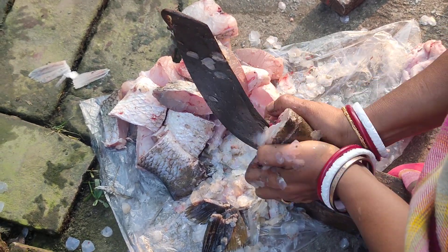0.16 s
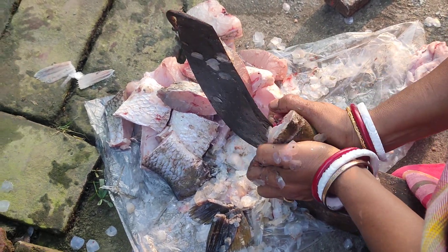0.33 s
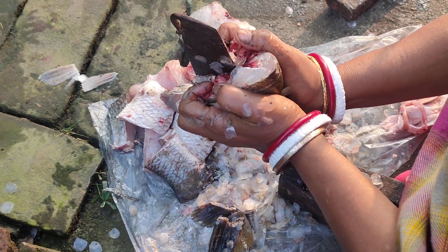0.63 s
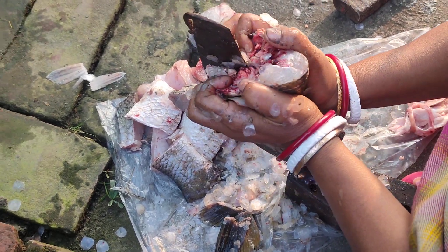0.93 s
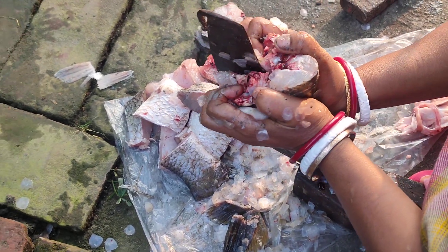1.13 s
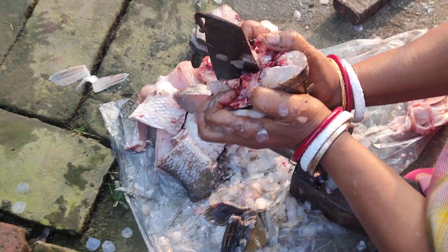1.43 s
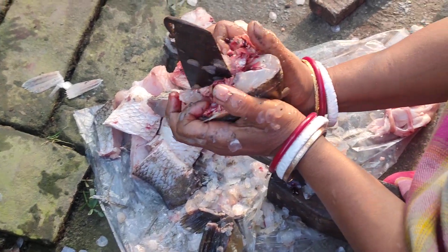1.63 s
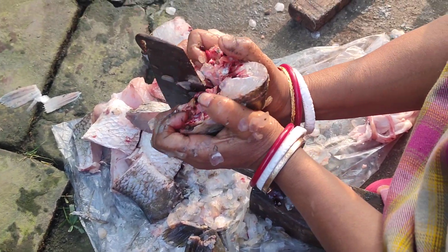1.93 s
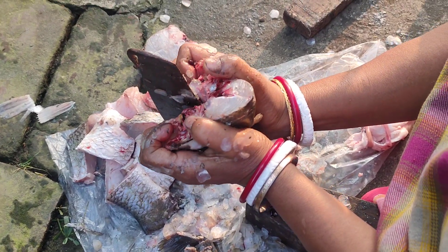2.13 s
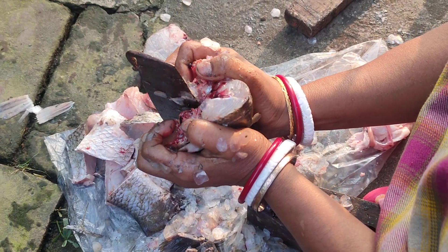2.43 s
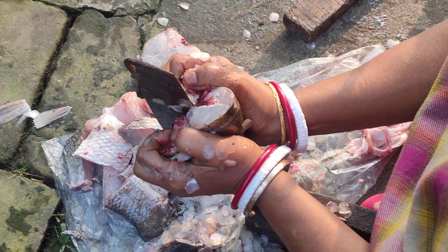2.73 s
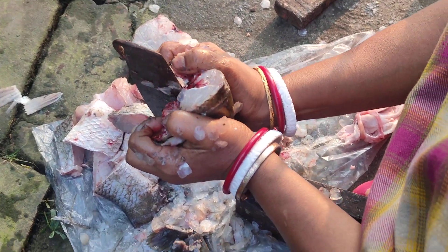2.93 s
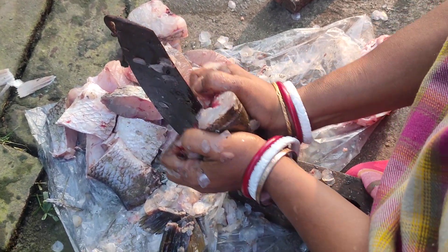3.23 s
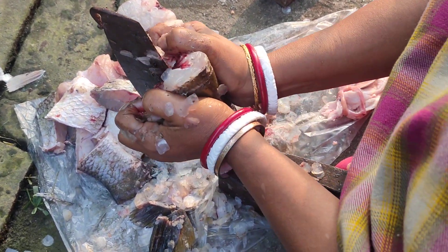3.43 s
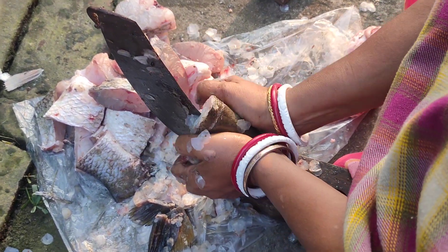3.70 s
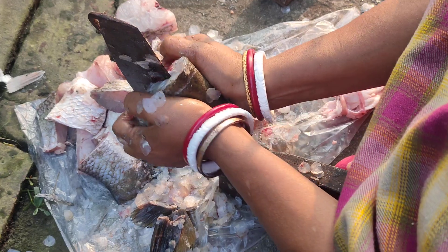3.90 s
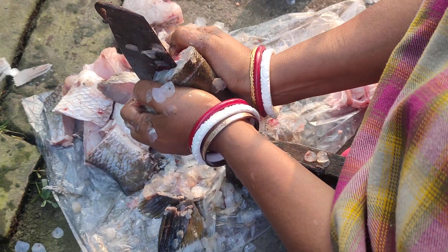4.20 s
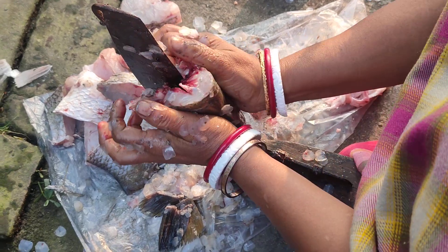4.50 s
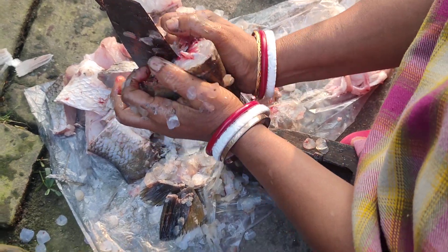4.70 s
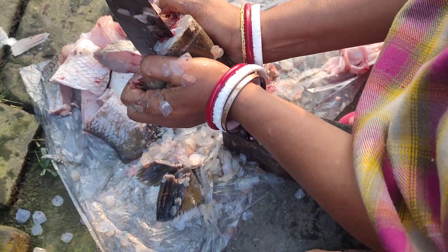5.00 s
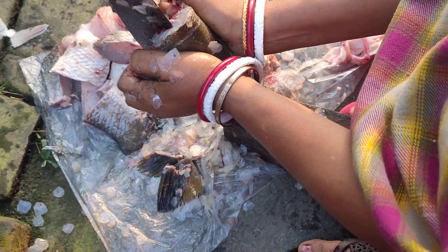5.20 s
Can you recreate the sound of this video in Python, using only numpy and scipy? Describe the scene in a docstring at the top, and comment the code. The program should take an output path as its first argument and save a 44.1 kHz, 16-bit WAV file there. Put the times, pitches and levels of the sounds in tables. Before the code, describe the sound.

A close, dry outdoor sound of a large fish head being pushed through an upright steel blade in a paved yard. At 0.1-0.3 s bone breaks in a tight cluster of loud cracks and bright snaps, with a dull squelch, followed by wet, grainy scraping until about 0.9 s. Around 1.0 s a songbird whistles a quick falling phrase; at 1.2-1.3 s a hard, sharp crack with a dull bump interrupts. The bird repeats near 1.5 and 1.9 s and ends with rougher chirps around 2.5 s, over a faint wavering hum. From 2.9 to 4.0 s come repeated crunches, splintering and moist slides, densest near 3.6 s, with a tiny groan at 3.9. A dry double click and brief steel ring come at 4.4 s. Softer scrapes, ticks and small cracks follow at 4.7-5.2 s, leaning left. Light rustle and hiss drift underneath; walls return short echoes.

```python
"""A fish head close by is pushed against an upright steel blade, while a faint hum and birds whistling between
the walls of a paved yard go on behind. Bone crunches, cracks and splinters as bursts of filtered noise grains;
wet flesh squelches and scrapes along the steel as noise coloured by the blade and by gaps that open.
Whistles are gliding sines; the hum, rustle and hiss are filtered noise. Echoes come off the yard walls."""
import sys
import numpy as np
from scipy import signal
from scipy.fft import rfft, irfft, next_fast_len
from scipy.io import wavfile
from scipy.ndimage import uniform_filter1d, map_coordinates

SR = 44100
rng = np.random.default_rng(int(sys.argv[2]) if len(sys.argv) > 2 else 0)


def wrap_up_sound(samples):
    """Save the sound to the file named by the first command line argument, as 16-bit audio."""
    columns = np.atleast_2d(samples).T
    # keep every value between -1 and 1, then stretch to whole-number steps
    tamed = np.clip(columns, -1, 1)
    steps = np.round(tamed * 32767).astype(np.int16)
    wavfile.write(sys.argv[1], SR, steps)


N = 236017

# In every table, levels are relative: trims in the function that plays it follow.
# Columns named left/dB give the left channel over the right.


def amp(db):
    """Decibels to gain."""
    return 10 ** (np.asarray(db) / 20)


def unit(x):
    """Scale to rms 1."""
    return x / np.sqrt(np.mean(x ** 2) + 1e-20)


def along(points, hz):
    """Interpolate (f/Hz, value) points on a log frequency axis."""
    f, v = np.transpose(points)
    return np.interp(np.log(hz + 1), np.log(f + 1), v)


def level(points):
    """Gain per sample from (t/s, level/dB) points."""
    return amp(np.interp(np.arange(N) / SR, *np.transpose(points)))


def wobble(rate, n=N):
    """A smooth random curve, rate knots a second."""
    knots = rng.standard_normal(int(n * rate / SR) + 4)
    return map_coordinates(knots, [np.arange(n) * rate / SR])


def add(track, s, x):
    """Mix x into the track at time s."""
    i = max(round(s * SR), 0)
    track[..., i:i + x.shape[-1]] += x[..., :max(N - i, 0)]


def body(spectrum, modes=(), size=4096):
    """Causal impulse response of energy 1: a broad spectrum lifted at its resonances."""
    hz = np.fft.rfftfreq(size, 1 / SR)
    db = along(spectrum, hz) + sum(lift / (1 + (2 * (hz - f) / w) ** 2) for f, w, lift in modes)
    # folding the cepstrum onto positive time gives minimum phase
    cepstrum = irfft(np.log(amp(db)))[:size // 2]
    h = irfft(np.exp(rfft(2 * cepstrum, size)))[:size // 2]
    return h / np.linalg.norm(h)


def through(x, h):
    """Convolve both channels with a response."""
    return signal.fftconvolve(np.atleast_2d(x), np.atleast_2d(h), axes=1)[:, :x.shape[-1]]


def pair(n, alike, size=0):
    """Stereo white noise, partly shared; the shared part reaches the left size samples late."""
    common, *own = rng.standard_normal((3, n))
    share = np.clip(alike, 0, 1)
    shared = np.array([np.roll(common, size), common])
    return np.sqrt(share) * shared + np.sqrt(1 - share) * np.array(own)


def pan(left_db):
    """Channel gains for a level difference, left over right."""
    return amp([[left_db / 2], [-left_db / 2]])


def grains(rate, spread_db, life):
    """Envelope of rms 1 of tiny fractures at random times and sizes."""
    sizes = amp(spread_db * np.clip(rng.standard_normal(N), -2, 2))
    hits = (rng.random(N) < rate / SR) * sizes ** 2
    power = signal.lfilter([1], [1, -np.exp(-2 / (life * SR))], hits)
    return unit(np.sqrt(power))


def patchy(x, depth_db, size=10):
    """Narrow bands of the sound come and go at random."""
    z = signal.stft(x, nperseg=512)[2]
    field = uniform_filter1d(rng.standard_normal(z.shape[1:]), 2, 0)
    field = uniform_filter1d(field, size, 1)
    gain = unit(amp(depth_db * np.clip(unit(field), -2, 2)))
    return signal.istft(z * gain, nperseg=512)[1][:, :N]


def cavities(lo_hz, hi_hz, width_hz, spread_db, count=40):
    """Chance resonances and notches of the gaps that open in flesh and bone."""
    centres = rng.uniform(lo_hz, hi_hz, count)
    return [(hz, width_hz, spread_db * (2 * rng.random() - 1)) for hz in centres]


def fracture(t60, edge, alike, size=0):
    """One sharp release, then a fast-dying, uneven crumble."""
    t = np.arange(SR // 10) / SR
    lumps = unit(amp(3 * np.clip(wobble(700, len(t)), -2, 2)))
    burst = amp(-60 * t / t60) * lumps * pair(len(t), alike, size=size)
    burst[0, size] += edge
    burst[1, 0] += edge
    return burst


def echo(x, decay):
    """The walls answer with a tail that dies at its own speed for each frequency."""
    hz, t, z = signal.stft(rng.standard_normal((2, 2 * SR // 3)), SR, nperseg=256)
    fading = z * amp(-60 * t / along(decay, hz)[:, None])
    tail = signal.istft(fading, SR, nperseg=256)[1]
    return through(x, tail / np.linalg.norm(tail[0]))


# spectra of the far hum, the light rustle and the soft treble hiss: (f/Hz, level/dB per Hz)
HUM_SPECTRUM = [(25, -27.5), (60, -7), (100, -10.5), (200, -18.5), (330, -21), (440, -6), (540, 4.5),
                (660, 8), (790, -9.5), (1000, -22), (1250, -40), (1700, -28), (2300, -44.5), (5000, -53),
                (16000, -80)]
RUSTLE_SPECTRUM = [(500, -19.5), (1200, -9), (1800, 7), (2500, -4), (3300, 1.5), (4100, 3), (4800, -25.5),
                   (7000, -39), (10000, -29)]
HISS_SPECTRUM = [(3000, -59.5), (5800, -9), (7200, 3.5), (8100, 3), (9200, -24.5), (11500, -27.5),
                 (13000, -39.5)]
# the hum swells now and then around one pitch: (t/s, length/s, f/Hz, level/dB, left/dB)
HUM_SWELLS = [(0.761, 0.25, 561, -56, 2), (2.227, 0.28, 767, -62, 4.5), (2.496, 0.18, 255, -69, -1),
              (3.703, .5, 677, -62.5, -4), (4.449, 0.99, 570, -76, 0)]
# how rustle and hiss rise and fall: (t/s, level/dB)
RUSTLE_COURSE = [(0, -87), (.4, -63), (1.3, -70.5), (1.55, -85), (1.97, -70), (2.22, -79.5), (2.65, -68),
                 (2.87, -83), (3.4, -53.5), (4.22, -83.5), (4.6, -76), (5.35, -74)]
HISS_COURSE = [(0.0, -105), (0.12, -100), (0.25, -61.5), (0.4, -70), (0.65, -74), (1.5, -81.5),
               (1.951, -74), (2.5, -82), (2.93, -76.5), (3.18, -71), (3.3, -61.5), (3.5, -64),
               (3.78, -68.5), (4.11, -79.5), (4.3, -89), (4.68, -83.5), (4.81, -75), (5.35, -74.5)]
HUM_WAVER_DB, HUM_FLUTTER_DB = 1.2, 1.2  # slow and quick unevenness
HISS_DB = -7  # against its course


def background():
    """A far hum on the left that wavers, its swells, a light rustle and a soft hiss, all filtered noise."""
    waver_db = HUM_WAVER_DB * wobble(3.7) + HUM_FLUTTER_DB * wobble(15)
    hum = through(pair(N, 0.44), body(HUM_SPECTRUM)) * amp(-68 + waver_db) * pan(17.4)
    for s, length, hz, db, left_db in HUM_SWELLS:
        n = int(length * SR)
        band = body([(hz * .4, -80), (hz * .7, -35), (hz * .95, -3),
                     (hz * 1.02, -3), (hz * 1.4, -35), (hz * 2, -90)])
        tone = unit(through(pair(n, 0.46), band))
        add(hum, s, amp(db) * np.sqrt(np.hanning(n)) * tone * pan(left_db))
    rustle = patchy(through(pair(N, .25), body(RUSTLE_SPECTRUM)), 6, size=24)
    hiss = through(pair(N, 0.12) * grains(1500, 2.0, 0.0035), body(HISS_SPECTRUM))
    hiss = patchy(hiss * amp(HISS_DB + 1.85 * wobble(15.0)) * pan(-20.5), 4, size=32)
    return hum + rustle * level(RUSTLE_COURSE) * pan(7.0) + hiss * level(HISS_COURSE)


# the songbird's phrase of four notes, before a song's stretch of the onsets and shift of the opening note:
# (t/s into the phrase, length/s, start f/Hz, end f/Hz, level/dB against the song, roughness 0-1)
SONG_PHRASE = [(0, .048, 4068, 3260, -4.5, 0.18), (0.095, 0.11, 2900, 2853, 1, 0.11),
               (0.155, .04, 2800, 2520, -3, .2), (.178, 0.06, 2109, 1660, -4, 0.17)]
# each full phrase: (t/s, level/dB, pitch ratio of the opening note, stretch of the onsets)
SONG_TIMES = [(.982, -47.5, 1, 0.94), (1.508, -48, 0.97, 1.004), (1.93, -47.5, 1.01, 1.03)]
# single notes and calls, among them the end of an earlier phrase:
# (t/s, length/s, start f/Hz, end f/Hz, level/dB, roughness 0-1)
SINGLE_NOTES = [(0, 0.076, 3380, 3140, -63, 0.16), (0, 0.15, 2670, 2570, -58, 0.15),
                (1.557, 0.043, 2170, 2226, -60.5, 0.16), (1.821, 0.17, 2900, 2846, -65, 0.25),
                (2.325, 0.13, 3323, 3270, -62.5, 0.28), (2.401, 0.1, 4260, 3950, -61, 0.02),
                (2.518, 0.0395, 2742, 2600, -43.5, 0.38), (2.544, 0.058, 2600, 2244, -43, 0.53),
                (2.784, 0.072, 3600, 3660, -60, 0.15)]
# how long the yard and its farther walls ring: (f/Hz, t60/s)
YARD_DECAY = [(100, 0.44), (500, 0.26), (2500, 0.25), (8000, 0.25), (16000, 0.15)]
FAR_WALL_DECAY = [(1000, 0.39), (3000, 0.53), (8000, 0.35)]
OVERTONE_DB = -26  # the octave of each whistle


def birds():
    """Gliding whistles with a faint octave, prolonged by near and far walls; harsh ones flutter in pitch."""
    out, octave = np.zeros((2, N))
    song = []
    for s, db, opening, stretch in SONG_TIMES:
        for i, (after, length, start_hz, end_hz, note_db, rough) in enumerate(SONG_PHRASE):
            pitch = opening if i == 0 else 1
            song.append((s + after * stretch, length, start_hz * pitch, end_hz * pitch, db + note_db, rough))
    for s, length, start_hz, end_hz, db, rough in song + SINGLE_NOTES:
        n = int(length * SR)
        flutter = 1 + .09 * rough * wobble(600, n) + .007 * wobble(60, n)
        hz = np.geomspace(start_hz, end_hz, n) * flutter
        phase = 2 * np.pi * np.cumsum(hz) / SR
        swell = amp(db) * np.sqrt(np.hanning(n))
        # a harsh note doubles its period, which adds partials halfway
        halfway = 0.59 * np.sin(phase / 2) + 1.3 * np.sin(3 * phase / 2)
        add(out, s, swell * (np.sin(phase) + rough ** 2 * halfway))
        add(octave, s, swell * (1 - rough) * np.sin(2 * phase))
    whistles = out * pan(7.5) + octave * amp(OVERTONE_DB) * pan(-4.0)
    near_walls = pair(SR // 12, 0) * amp(-20 * np.linspace(0, 1, SR // 12))
    heard = whistles + amp(-5) * through(whistles, near_walls / np.linalg.norm(near_walls[0]))
    far = amp(-5.5) * echo(whistles, YARD_DECAY) + amp(-3) * echo(whistles, FAR_WALL_DECAY)
    return amp(-6.5) * heard + far


PUSH_ATTACK_S, PUSH_RELEASE_S = 0.016, 0.033  # time to rise or fall by 20 dB


def effort(s, length):
    """One push: it bites quickly, holds, then lets go."""
    t = np.arange(N) / SR - s
    away = np.maximum(-t / PUSH_ATTACK_S, (t - length) / PUSH_RELEASE_S)
    return amp(-20 * np.maximum(0, away))


# pushes that drive the blade through bone: (t/s, length/s, flesh level/dB, bone level/dB, splinter level/dB)
BLADE_PUSHES = [(0.091, 0.019, -53.5, -43, -45.5), (0.137, 0.032, -61, -41, -41),
                (1.216, 0.034, -65, -64, -46.5), (2.997, 0.12, -61.5, -47, -54.5),
                (3.245, 0.14, -62.5, -53, -55), (3.611, 0.076, -59.5, -47.5, -42),
                (3.838, 0.082, -63.5, -50.5, -63)]
# spectra of flesh, bone and splinters: (f/Hz, level/dB per Hz)
FLESH_SPECTRUM = [(40, -31.5), (120, -27), (220, -16.5), (295, 2), (380, -9), (520, -12), (900, -35),
                  (3000, -100)]
BONE_SPECTRUM = [(100, -44), (300, -6.5), (520, 0.5), (1000, 1), (2000, 0.5), (2500, -2), (3800, -4.5),
                 (4400, -8), (5000, -22.5), (7000, -13.5), (16000, -46)]
SPLINTER_SPECTRUM = [(500, -49), (2000, -8.5), (3200, 5.5), (4300, 4), (5000, -17.5), (5900, -4.5),
                     (7200, 1.5), (8400, 6), (9600, -5.5), (11700, -5.5), (13400, -16), (15300, -10.5),
                     (17000, -31.5)]
# resonances of the skull and of thin bone at the edge: (f/Hz, width/Hz, lift/dB)
SKULL_MODES = [(990, 230, 5), (1390, 210, -3.5), (1810, 210, 4), (2746, 21, 13), (3100, 52, 4),
               (3965, 120, 4)]
EDGE_MODES = [(3078, 77, 11.6), (5770, 79, 14), (8600, 43, 11), (11570, 760, 10)]
FLESH_LAG_S = 0.0051  # the flesh yields just after the bone


def crunch():
    """Under each push the flesh squelches, spongy bone crumbles and fine splinters crackle."""
    squeeze, crush, split = np.zeros((3, N))
    for s, length, flesh_db, bone_db, splinter_db in BLADE_PUSHES:
        squeeze += amp(flesh_db) * effort(s + FLESH_LAG_S, length)
        crush += amp(bone_db) * effort(s, length)
        split += amp(splinter_db) * effort(s, length)
    flesh = through(pair(N, 1.0) * grains(400, 2.0, 0.026), body(FLESH_SPECTRUM))
    flesh = flesh * squeeze * pan(1.1)
    bone = through(pair(N, 0.43) * grains(420, 3, .004), body(BONE_SPECTRUM, SKULL_MODES))
    bone = bone * crush * amp(-2.0) * pan(4.2)
    crackle = pair(N, 0.085, size=5) * grains(490, 1.3, 0.003)
    fine = through(crackle, body(SPLINTER_SPECTRUM, EDGE_MODES)) * split * amp(-4.0) * pan(-7.0)
    return flesh + patchy(bone, 3.1, size=4) + patchy(fine, 5.6, size=4)


# thin bones snap on the edge: (t/s, level/dB)
THIN_SNAPS = [(0.086, -32), (.129, -24), (0.152, -25.5), (0.176, -28), (.286, -31.5), (.302, -31),
              (.314, -29), (.486, -33.5), (0.849, -51), (1.179, -39), (1.223, -39), (1.25, -29.5),
              (1.328, -32), (2.933, -37.5), (2.999, -31), (3.029, -32), (3.176, -42.5), (3.22, -29.5),
              (3.265, -33.5), (3.3542, -27), (3.545, -40), (3.5604, -26), (3.606, -32), (3.692, -28),
              (3.967, -31.5), (3.989, -37.5), (4.63, -50.5), (4.714, -36.5), (4.757, -55), (4.908, -33),
              (4.945, -39), (5.041, -44.5), (5.129, -46), (5.333, -47)]
SNAP_T60_S = .03


def snaps():
    """Thin bones break with a bright tick, each with its own pitch and ring."""
    out = np.zeros((2, N))
    for s, db in THIN_SNAPS:
        shift = 1 + 0.028 * rng.standard_normal()
        modes = [(hz * shift, w, lift) for hz, w, lift in EDGE_MODES] + cavities(5460, 16000, 220, 7.6)
        colour = body(SPLINTER_SPECTRUM, modes, size=1024)
        add(out, s, amp(db) * through(fracture(SNAP_T60_S, 2.4, 0.68, size=5), colour))
    return out * amp(-9.0) * pan(-2.0)


# thick bone gives way: (t/s, level/dB, centre f/Hz, thud level/dB against the crack, left/dB)
BONE_CRACKS = [(0.093, -40, 2360, -4, -3), (0.142, -20, 2900, -26, 9.5), (0.164, -26, 1710, -22, 15.5),
               (.1772, -15, 1710, -15, 1.5), (1.1993, -22, 525, -17, 5), (1.222, -12, 3550, -33, 12),
               (1.2225, -26, 928, -15, -5), (1.228, -19.5, 3420, -25, 3), (1.2459, -22.5, 3460, -26, 24),
               (1.257, -32, 2900, -14, 25), (2.933, -38, 2840, -32, 3), (3.003, -25, 850, -31, 0),
               (3.043, -31, 920, -19, -4), (3.051, -22, 950, -15, 1), (3.053, -30, 2400, -22, 22),
               (3.0716, -26.5, 1830, -28, 19.5), (3.104, -31, 1420, -14, 8), (3.253, -26.5, 1090, -11.5, 4),
               (3.281, -28, 1080, -0.5, 4), (3.31, -34, 1220, -8, -1), (3.355, -37, 3070, -16.5, 15),
               (3.368, -36, 890, -3, 4), (3.5233, -29.5, 2060, -30, 6), (3.605, -31.5, 1670, -8, 1),
               (3.62, -29, 1830, -17, 15), (3.64, -25, 1420, -22, 9), (3.66, -18.5, 1250, -22, 2),
               (3.681, -20, 3700, -21, 12), (3.691, -36, 2000, -21, 1), (3.728, -32, 3430, -28, 16),
               (3.743, -31, 1550, -26, 5), (3.863, -30, 1600, -14, 5), (4.755, -44, 1550, -27, 3),
               (4.772, -38.5, 1500, -24, 7), (4.824, -38.5, 970, -31, 22), (5.098, -35, 1200, -15.5, 34),
               (5.104, -42, 1560, -20, 24), (5.112, -36.5, 785, -19, 32), (5.119, -49, 587, -8, 19.5)]
CRACK_T60_S, CRACK_EDGE = .03, 5.5  # decay; height of the first release
CRACK_RING_DB = 3  # each break rings briefly at its centre


def cracks():
    """Each break is a fast-dying burst that rings the skull and shoves the flesh."""
    burst, shove = np.zeros((2, N)), np.zeros((2, N))
    for s, db, hz, thud_db, left_db in BONE_CRACKS:
        modes = [(hz, hz / 4, CRACK_RING_DB)] + cavities(460.0, 4512.3, 120, 6.2)
        colour = body([(hz / 4, -14), (hz, 0), (hz * 3, -12)], modes, size=1024)
        snap = through(fracture(CRACK_T60_S, CRACK_EDGE, 0.93), colour)
        add(burst, s, amp(db) * snap * pan(left_db))
        add(shove, s, amp(db + thud_db) * fracture(0.058, 1.5, 1.0) * pan(left_db / 2))
    skull = through(burst, body(BONE_SPECTRUM, SKULL_MODES)) * amp(-21.0)
    return skull + through(shove, body(FLESH_SPECTRUM)) * amp(-12.5)


CRUMBS_PER_S, CRUMB_SPREAD_DB, CRUMB_DB = 22, 6.5, -9  # tiny ticks; level against the scrape


def crumbs(pressure):
    """Tiny bits of bone and scale tick at random while the blade slides."""
    sizes = amp(CRUMB_SPREAD_DB * np.clip(rng.standard_normal(N), -2, 2))
    ticks = (rng.random(N) < CRUMBS_PER_S / SR) * sizes
    crackle = through(ticks * np.sqrt(pressure), fracture(0.014, 2.6, 0.54, size=5))
    return through(crackle, body(SPLINTER_SPECTRUM, EDGE_MODES)) * amp(CRUMB_DB) * pan(-10.0)


# the blade slides through meat; rise and fall are the times to 20 dB below the peak:
# (t/s of the peak, rise/s, fall/s, level/dB, middle f/Hz of the gap resonance, its lift/dB, left/dB)
MEAT_SLIDES = [(.26, 0.11, 0.27, -57, 3330, 18.5, 9.5), (.46, 0.33, 0.59, -51, 3240, 19.5, 6.5),
               (.49, 0.2, 0.24, -50, 1720, 24.5, 4), (.51, 0.16, 0.15, -52, 1010, 22.5, 0.5),
               (.73, 0.33, 0.6, -61.5, 3180, 27, 9), (.88, 0.13, 0.36, -67, 2000, 19, -2),
               (.955, 0.146, 0.064, -56.5, 1020, 22.5, 3), (1.2, 0.14, 0.28, -53.5, 2070, 13, 5),
               (1.252, 0.056, 0.036, -41, 3500, 26, 8), (3.19, 0.16, 0.119, -59, 1910, 28.5, 11.5),
               (3.3, 0.11, 0.19, -51, 1900, 0.5, 9), (3.37, 0.13, 0.29, -57, 3800, 7, 5),
               (3.625, 0.13, 0.13, -44.5, 1390, 12.5, 4), (3.749, 0.1, 0.28, -51.5, 2660, 9, 5.5),
               (3.86, 0.16, 0.075, -46.5, 1580, 17, 7), (3.929, 0.026, 0.031, -50, 1540, 21.5, 5.5),
               (4.46, 0.11, 0.5, -59.5, 2160, 17.5, 9.5), (4.84, 0.14, 0.49, -60.5, 750, 13, 18.5),
               (4.972, 0.054, 0.097, -48.5, 2670, 9.5, 15.5), (5.03, 0.14, 0.22, -48.5, 2300, 20, 6.5)]
# spectra of the scrape and of the fizzing slime: (f/Hz, level/dB per Hz)
SLIDE_SPECTRUM = [(150, -28), (350, -2), (1000, -7.5), (1700, -4.5), (2400, -1.5), (3400, -4.5),
                  (4100, -7.5), (4900, -49), (7500, -26), (12000, -22), (13500, -60.5)]
FIZZ_SPECTRUM = [(3000, -41.5), (4800, -18), (6000, 2.5), (8000, 8.5), (9500, 1.5), (11800, -10.5),
                 (13000, -27.5), (16000, -24.5)]
# the blade colours every scrape: (f/Hz, width/Hz, lift/dB)
BLADE_MODES = [(1023, 123, 11), (1390, 130, -2.5), (1735, 130, 5.5), (2380, 110, -3.5), (3086, 250, 4.5)]
SWELL_ROUNDNESS = 1.14  # above 1, a slide holds near its peak
GAP_SINK = 0.056  # share by which the gap resonance starts above and ends below its middle
DRAG_DB, DRAG_PER_S = 1.54, 33.24  # the meat catches and slips, so the scrape is uneven


def slides():
    """Wet meat drags along the blade in a soft scrape; the gap's resonance sinks as each slide opens it."""
    out, pressure = np.zeros((2, N)), np.zeros(N)
    t = np.arange(-SR // 2, SR) / SR
    for s, rise, fall, db, hz, lift_db, left_db in MEAT_SLIDES:
        away = np.maximum(-t / rise, t / fall)
        swell = amp(db - 20 * away ** SWELL_ROUNDNESS + DRAG_DB * wobble(DRAG_PER_S, len(t)))
        drag = swell * pair(len(t), 0.37)
        opened = np.clip((t + rise / 2) / ((rise + fall) / 2), 0, 1)
        narrow_hz, wide_hz = hz * (1 + GAP_SINK), hz * (1 - GAP_SINK)
        narrow = body(SLIDE_SPECTRUM, BLADE_MODES + [(narrow_hz, narrow_hz * 0.5, lift_db)])
        wide = body(SLIDE_SPECTRUM, BLADE_MODES + [(wide_hz, wide_hz * 0.5, lift_db)])
        scrape = through(drag * (1 - opened), narrow) + through(drag * opened, wide)
        skip = max(round((1 / 2 - s) * SR), 0)  # the part that would lie before time 0
        add(out, s - 1 / 2, scrape[:, skip:] * pan(left_db))
        add(pressure, s - 1 / 2, swell[skip:] ** 2)
    rasp = patchy(out * grains(1500, 2.5, .0025), 4.5, size=20)
    # the film of slime fizzes in step with the scrape
    fizz = through(pair(N, 0.25, size=5) * grains(1500, 2.4, .002), body(FIZZ_SPECTRUM)) * np.sqrt(pressure)
    return crumbs(pressure) + rasp * amp(-1.34) + fizz * amp(-30.0) * pan(-16.0)


# bone chips tick against the blade: (t/s, level/dB)
CHIP_PINGS = [(.142, -29.5), (4.667, -58), (4.9038, -35.5), (4.944, -48)]
# modes of the blade's tip: (f/Hz, level/dB, t60/s)
TIP_MODES = [(2900, -10, 0.046), (6100, -20.5, 0.03), (7900, -19.5, 0.014), (8170, -2, 0.033),
             (11980, -7.5, 0.013)]


def pings():
    """A light tick rings the tip of the blade for a few milliseconds."""
    out, t = np.zeros((2, N)), np.arange(SR // 12) / SR
    for s, db in CHIP_PINGS:
        for hz, mode_db, t60 in TIP_MODES:
            ring = amp(db + mode_db - 60 * t / t60) * np.sin(2 * np.pi * hz * t)
            # the high modes beam to the right
            add(out, s, ring * pan(4 if hz < 5000 else -10))
    return out


# the flesh rubs on the steel in quick slips: (t/s, length/s, slip rate f/Hz, level/dB, left/dB)
FLESH_RUBS = [(1.06, 0.12, 258, -63, 4), (3.865, 0.04, 302, -46.5, -0.5), (4.81, 0.082, 384, -69.5, 27),
              (5.103, 0.028, 474, -60.5, 25)]


def rubs():
    """Skin sticks and slips on the steel with a short, low groan."""
    out = np.zeros((2, N))
    for s, length, rate, db, left_db in FLESH_RUBS:
        n = int(length * SR)
        phase = 2 * np.pi * np.cumsum(rate * (1 + 0.158 * wobble(132.0, n))) / SR
        groan = np.sin(phase) + 0.47 * np.sin(2 * phase)
        add(out, s, amp(db) * np.sqrt(2 * np.hanning(n)) * groan * pan(left_db))
    return out


# dull bumps as the load shifts: (t/s, level/dB, f/Hz, left/dB)
LOAD_BUMPS = [(1.223, -24, 382, -1), (1.463, -39.5, 206, 29.5)]


def bumps():
    """The load shifts with one dull push and no ring."""
    out, t = np.zeros((2, N)), np.arange(SR // 25) / SR - 1 / 50
    for s, db, hz, left_db in LOAD_BUMPS:
        u = (np.pi * hz * t) ** 2
        add(out, s - 1 / 50, amp(db) * (2 * u - 1) * np.exp(-u) * pan(left_db))
    return out * amp(-6)


# the bone grazes the blade and makes it ring: (t/s of the peak, level/dB)
BONE_GRAZES = [(4.364, -46), (4.42, -43.5)]
# resonances of the ringing steel: (f/Hz, width/Hz, lift/dB)
STEEL_MODES = [(1063, 89, 20), (2600, 110, 20), (3170, 104, 20), (3460, 43, 11.7), (8210, 410, 19.5)]


def grazes():
    """A short graze of bone sets the blade ringing, damped by the meat."""
    out, t = np.zeros((2, N)), np.arange(SR // 5) / SR - 1 / 20
    for s, db in BONE_GRAZES:
        swell = amp(db - 20 * np.maximum(-t / 0.019, t / 0.026))
        add(out, s - 1 / 20, swell * pair(len(t), 0.16))
    return through(out, body(BONE_SPECTRUM, STEEL_MODES)) * pan(2.1)


# a joint lets go with two sharp clicks: (t/s, level/dB)
JOINT_CLICKS = [(4.3917, -24), (4.3925, -20.5)]
# spectrum of one click: (f/Hz, level/dB per Hz)
CLICK_SPECTRUM = [(25, -32), (70, -3.5), (200, -1.5), (1000, -2), (2500, -4.5), (3900, -7.5), (4900, -21.5),
                  (7000, -27.5), (12000, -32.5), (16000, -62)]


def joint():
    """Each click is a single dry release, close on the left."""
    out, click = np.zeros(N), body(CLICK_SPECTRUM)
    for s, db in JOINT_CLICKS:
        add(out, s, -amp(db) * click / np.abs(click).max())
    return out * amp(-9.5) * pan(26.4)


def scene():
    """The cutting close by, its echo, the birds and the background."""
    cut = crunch() + snaps() + cracks() + slides() + pings() + rubs() + bumps() + grazes() + joint()
    return background() + birds() + cut + amp(-9.0) * echo(cut, YARD_DECAY)


TOP_HZ = 16500


def record(dry):
    """The recorder keeps nothing above its band limit."""
    m = next_fast_len(N + SR // 4)
    kept = np.fft.rfftfreq(m, 1 / SR) < TOP_HZ
    return irfft(rfft(dry, m) * kept, m)[:, :N]


dry = scene()
out = record(dry)
wrap_up_sound(out)
```